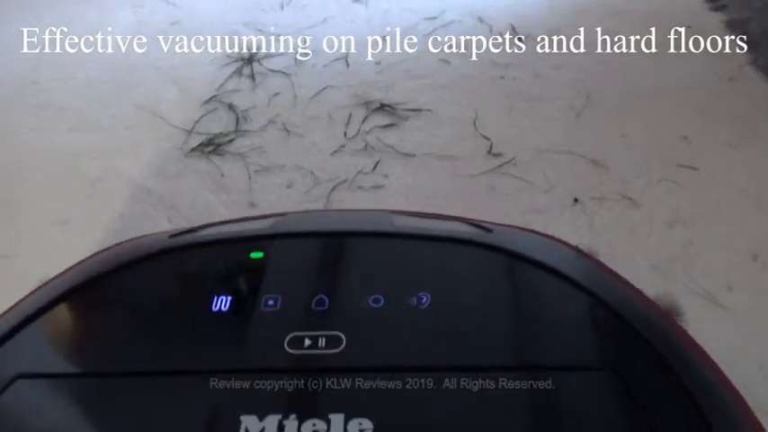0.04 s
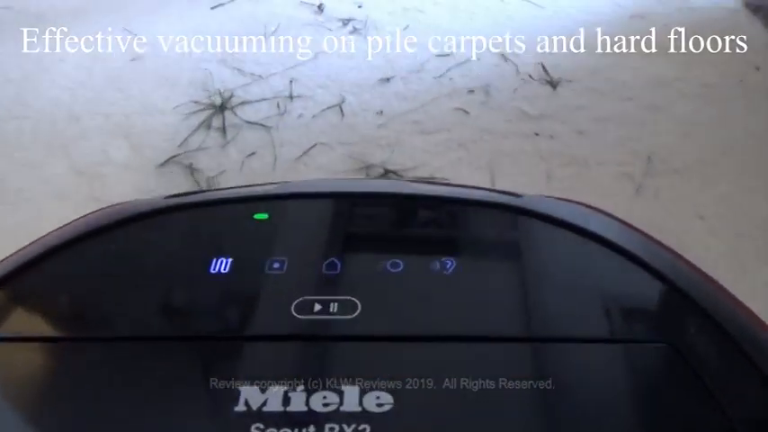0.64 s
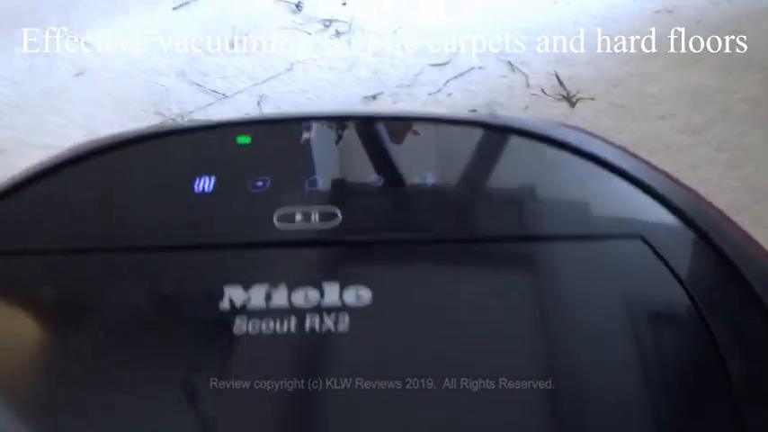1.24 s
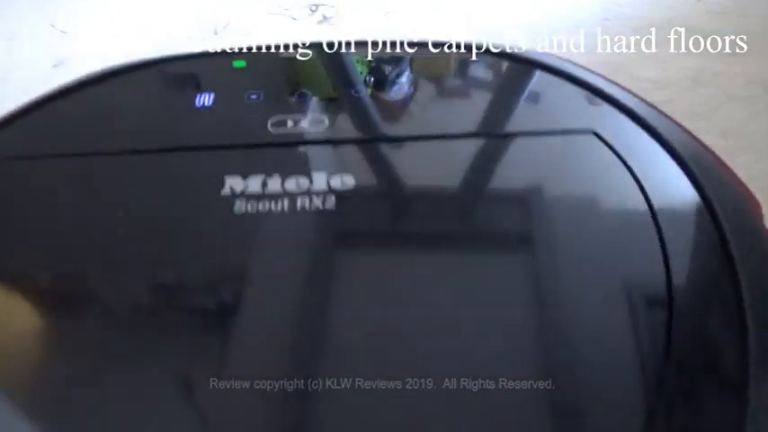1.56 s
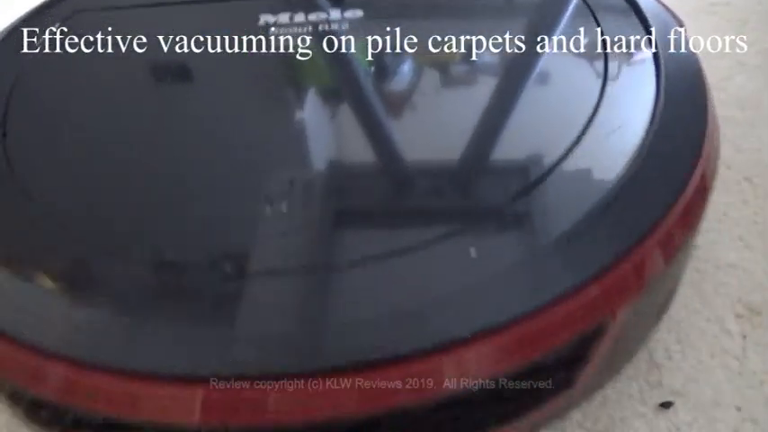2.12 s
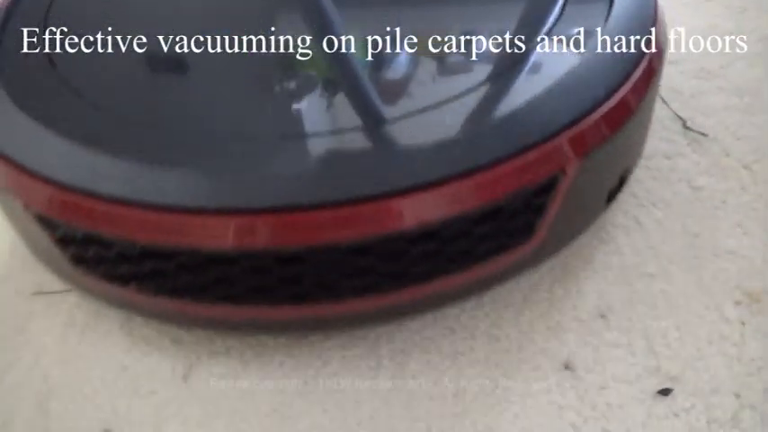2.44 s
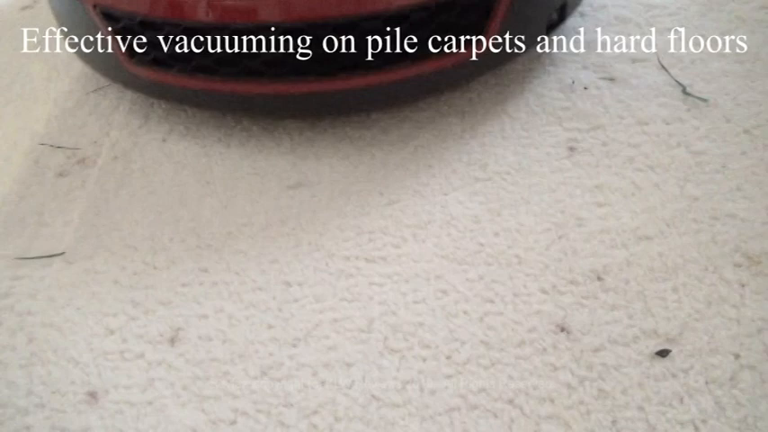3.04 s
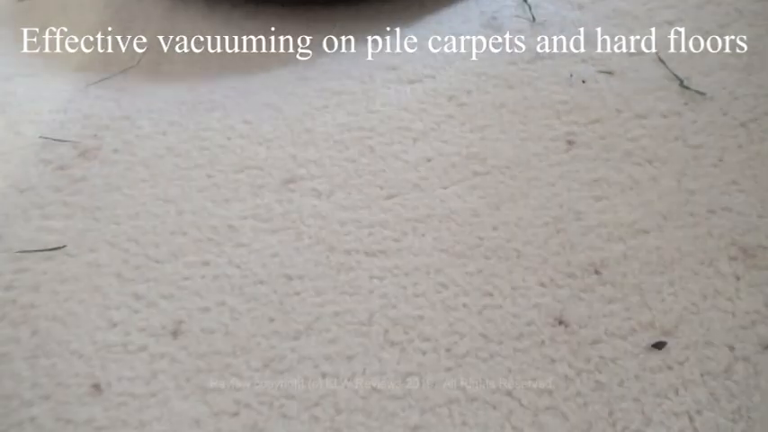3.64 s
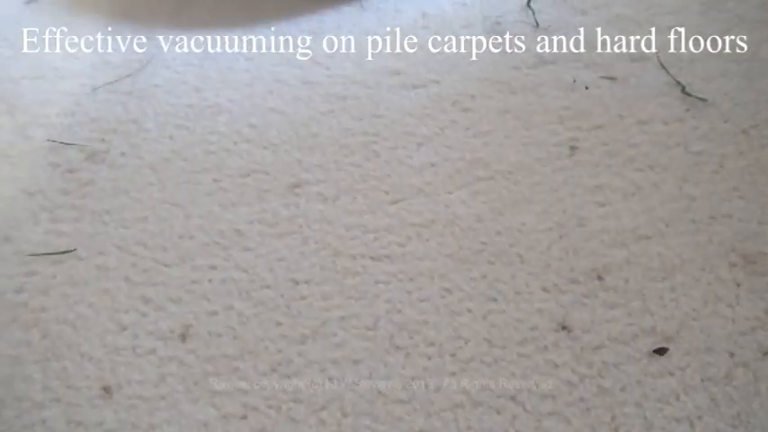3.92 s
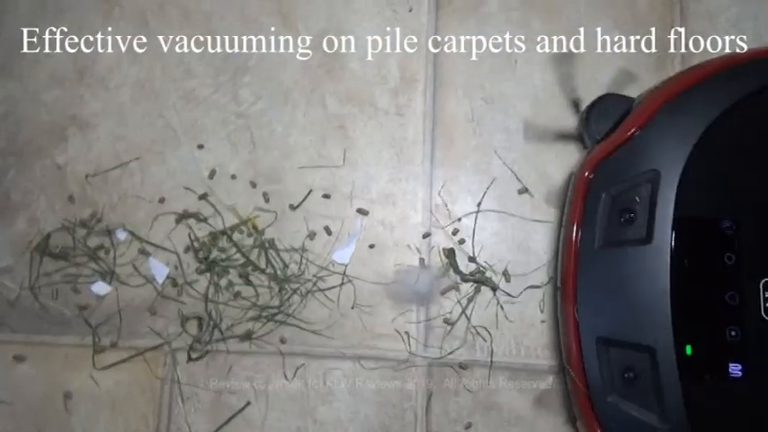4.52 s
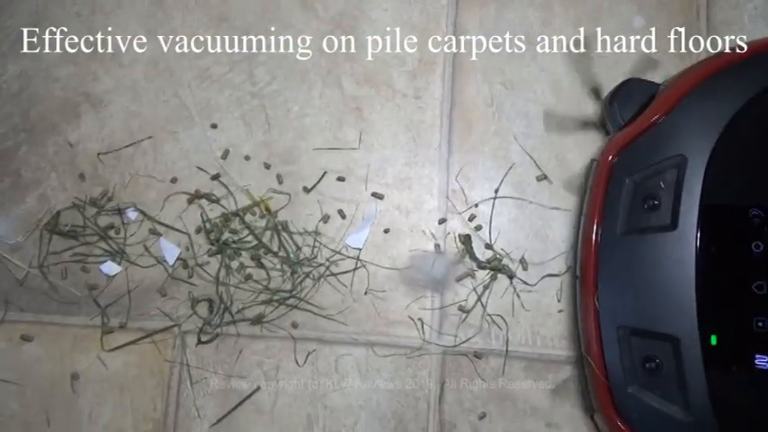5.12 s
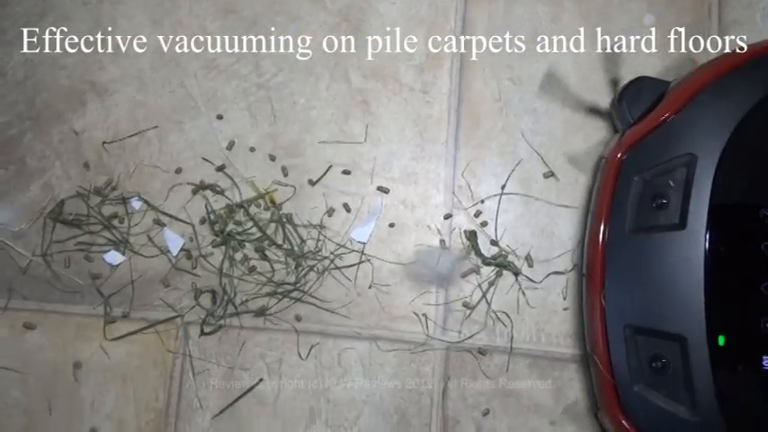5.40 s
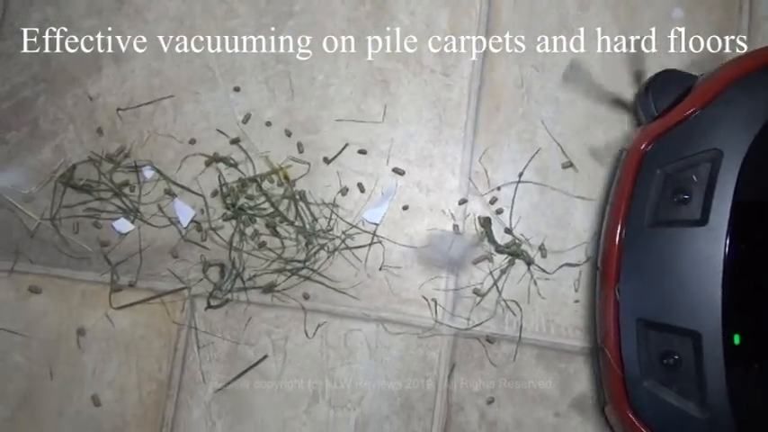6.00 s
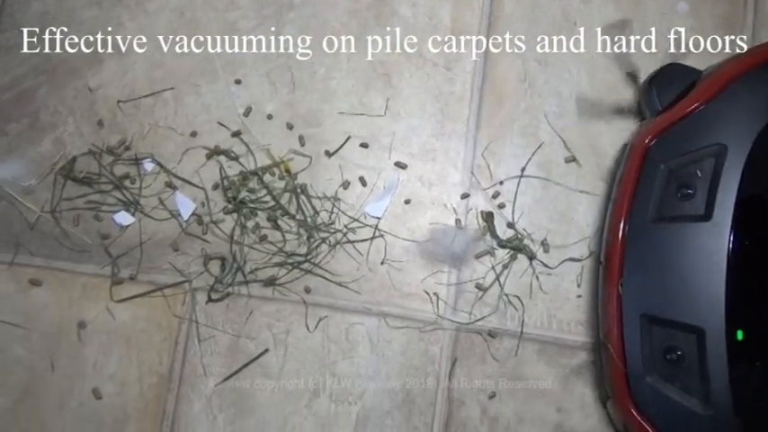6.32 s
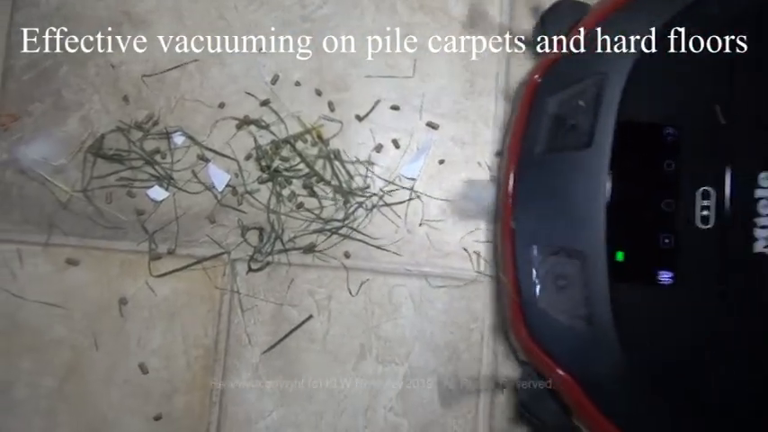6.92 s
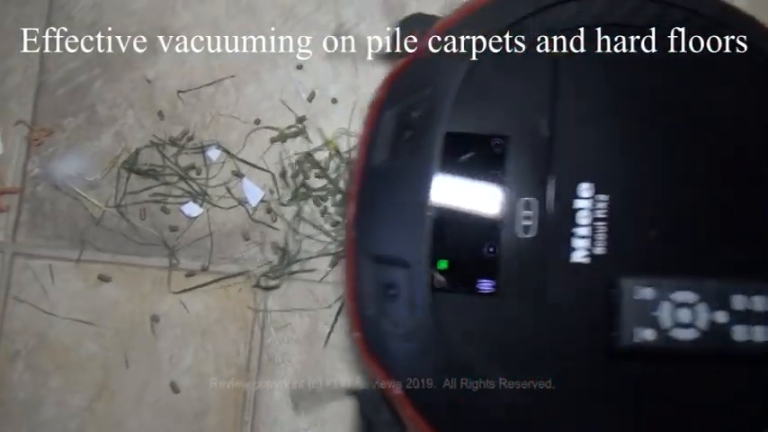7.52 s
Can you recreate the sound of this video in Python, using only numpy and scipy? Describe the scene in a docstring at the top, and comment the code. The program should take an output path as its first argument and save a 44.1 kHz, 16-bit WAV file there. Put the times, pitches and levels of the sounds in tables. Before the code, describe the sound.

A robot vacuum hums and rushes past on carpet, then creeps closer on tiles, sucking up crackling grass and seeds.

```python
"""A robot vacuum cleaner hums and rushes past on carpet, close by, and drives off. The scene dissolves
to a tiled floor, where its brush motor spins up and it creeps nearer, bumps over joints and sucks up
grass and seeds. Motor orders, an exhaust whistle and gear whine ride on the rumble of the roller brush
and on air rushing through ducts; seeds, grit and stalks tick and crack against the plastic."""
import sys
import numpy as np
from scipy import signal
from scipy.fft import rfft, irfft, next_fast_len
from scipy.io import wavfile
from scipy.ndimage import uniform_filter1d, map_coordinates

SR = 44100
rng = np.random.default_rng(int(sys.argv[2]) if len(sys.argv) > 2 else 0)


def waveform_to_disk(signal):
    """Save audio, clipped to [-1, 1], as 16-bit WAV at the path in sys.argv[1]."""
    frames = np.transpose(np.atleast_2d(signal))
    scaled = np.clip(frames, -1, 1) * 32767
    samples = np.round(scaled).astype(np.int16)
    wavfile.write(sys.argv[1], SR, samples)


N = 341775
TIME = np.arange(N) / SR
DRIVEN_CM = 20 * TIME  # the robot crosses the carpet at 20 cm a second


def amp(db):
    """Decibels to gain."""
    return np.exp(np.asarray(db) * (np.log(10) / 20))


def unit(x):
    """Scale to rms 1."""
    return x / np.sqrt(np.mean(x ** 2) + 1e-20)


def along(points, hz):
    """Read (Hz, value) points on a log frequency axis."""
    f, v = np.transpose(points)
    return np.interp(np.log(hz + 1), np.log(f + 1), v)


def curves(rows):
    """One automation curve for each column after the time."""
    s, *cols = np.transpose(rows)
    return [np.interp(TIME, s, c) for c in cols]


def wobble(rate):
    """A smooth random curve, rate knots a second."""
    coarse = TIME[::32]
    knots = rng.standard_normal(int(N * rate / SR) + 4)
    return np.interp(TIME, coarse, map_coordinates(knots, [coarse * rate], order=2))


def swells(rows):
    """Gain of bell-shaped swells. Each row: centre in seconds, level in dB, half length in seconds."""
    return np.sqrt(sum(amp(2 * db) * np.exp(-2 * ((TIME - s) / half_s) ** 2) for s, db, half_s in rows))


def filtered(x, response):
    """Shape x with a frequency response."""
    m = next_fast_len(N + 8192)
    return irfft(rfft(x, m) * response(np.fft.rfftfreq(m, 1 / SR)), m)[..., :N]


def rush(spectrum):
    """Noise of rms 1 with this spectrum, dying away above its last point."""
    top_hz = spectrum[-1][0]
    white = rng.standard_normal(N)
    return unit(filtered(white, lambda hz: amp(along(spectrum, hz)) / (1 + (hz / top_hz) ** 8)))


def angle(hz):
    """Phase of something that turns hz times a second."""
    return 2 * np.pi * (np.cumsum(hz) / SR + rng.random())


def tone(phase, db):
    """A sine with this rms level."""
    return np.sqrt(2) * amp(db) * np.sin(phase)


def duct(hz, width_hz):
    """Turbulence singing in one narrow resonance, at rms 1."""
    m = next_fast_len(N)
    gain = 1 / (1 + ((np.fft.rfftfreq(m, 1 / SR) - hz) / width_hz) ** 2)
    real, imag = rng.standard_normal((2, len(gain)))
    return unit(irfft(gain * (real + 1j * imag), m)[:N])


def passing_db(front_db, side_db, rear_db, at_cm, reach_cm):
    """Level of a part that shows its front, its side (after at_cm of travel), then its rear."""
    past = (DRIVEN_CM - at_cm) / reach_cm
    end_db = np.where(past < 0, front_db, rear_db)
    return end_db + (side_db - end_db) / (1 + past ** 2)


def carpet_roller(bite_db=4, bite_s=0.22):
    """Bristles beat the pile into a rumble, taking a moment to bite."""
    # Each row: frequency in Hz, relative level in dB.
    rumble = [(20, -60), (32, -50), (45, -46), (75, -25.5), (115, -12), (185, -9.5), (235, -6), (310, 4.5),
              (390, -7), (450, -1.5), (500, -7), (580, -6)]
    level_db = passing_db(-23, -22.5, -29, at_cm=65, reach_cm=15) - bite_db * np.exp(-TIME / bite_s)
    return rush(rumble) * amp(level_db + 0.36 * wobble(23.7))


def floor_colour(x, depth_db=0.46):
    """Floor reflections: a slow random drift in the colour of the air noise."""
    bands = signal.stft(x, nperseg=512)[2]
    drift = uniform_filter1d(rng.standard_normal(bands.shape), size=3, axis=0)
    drift = uniform_filter1d(drift, size=90, axis=1)
    return signal.istft(bands * amp(depth_db * unit(drift)), nperseg=512)[1][:N]


def carpet_air():
    """Air rushes through housing, intake and exhaust grille, each passing in its turn."""
    # Five bands of air noise, low to high. Each row: frequency in Hz, relative level in dB.
    housing_eq = [(380, -32), (520, -1), (680, 4.5), (800, 1.5), (1000, 0.5), (1250, -3), (1500, -10.5),
                  (2200, -54)]
    suction_eq = [(1000, -13), (1450, -1), (1650, 0), (2000, -1.5), (2400, -1.5), (3000, 0), (3500, -3.5),
                  (3900, -11), (5000, -16)]
    exhaust_eq = [(3000, -12.5), (3700, -2), (4000, -4), (4350, -1), (4900, -7), (5200, -8), (6000, -13)]
    hiss_eq = [(4500, -28), (5200, -3.5), (5600, 1.5), (6000, -0.5), (6800, 3), (7500, 1), (8200, 0),
               (8800, 3), (9600, -1.5), (10400, -5.5), (11200, -9), (13000, -35)]
    fizz_eq = [(9500, -27), (10600, 0), (11200, -3.5), (11900, -2), (13000, -2), (13700, -5), (14500, -6),
               (15700, -17)]
    housing = rush(housing_eq) * amp(passing_db(-29.5, -26.5, -35, at_cm=61, reach_cm=31.5))
    suction = rush(suction_eq) * amp(passing_db(-27, -26, -36, at_cm=42, reach_cm=19.5))
    suction *= amp(0.32 * wobble(40))
    exhaust = rush(exhaust_eq) * amp(passing_db(-38, -30, -41, at_cm=62.5, reach_cm=26))
    hiss = rush(hiss_eq) * amp(passing_db(-34.6, -30, -36.5, at_cm=43, reach_cm=10))
    fizz = rush(fizz_eq) * amp(passing_db(-43.5, -35.5, -40.5, at_cm=51.5, reach_cm=6))
    flutter = amp(1.04 * wobble(60))
    return housing + floor_colour(suction + (exhaust + hiss + fizz) * flutter)


def carpet_ducts(shade_db=11):
    """Narrow air resonances bloom as they come alongside, shaded ahead and behind."""
    # Each row: pitch in Hz, width in Hz, level alongside in dB, travel to there in cm, reach in cm.
    resonances = [(234, 13, -36.5, 38, 130), (322.5, 33, -26, 48, 83), (412.5, 67, -21, 14, 26),
                  (534, 25, -37.5, 77, 34), (878, 13, -32, 71, 34), (2100, 12, -36.5, 27, 30),
                  (3600, 77, -36.5, 11, 21), (3660, 160, -32, 55, 14), (4800, 92, -37.5, 57, 37),
                  (8250, 140, -41, 28, 17), (9050, 100, -43.5, 38, 50), (9480, 150, -39, 64, 9.9),
                  (9880, 170, -38.5, 37, 14), (10080, 170, -41, 71, 16), (10900, 130, -51, 38, 35),
                  (13400, 200, -52, 16, 50)]
    return sum(duct(hz, width_hz) * amp(passing_db(db - shade_db, db, db - shade_db, at_cm, reach_cm))
               for hz, width_hz, db, at_cm, reach_cm in resonances)


def exhaust_whistle(shaft):
    """The motor's sixth order drives a rough, fluttering whistle that comes and goes."""
    # Each row: centre in seconds, relative level in dB, half length in seconds.
    catches = [(.78, -23.5, 0.69), (2.45, -24.5, 0.58), (3.3, -31.5, 0.4), (4.05, -31, 0.16)]
    whistle = tone(angle(6 * shaft + 6 + 18 * wobble(60)), -7.5 + 2 * wobble(45))
    breath = amp(-7) * duct(hz=2648, width_hz=53)
    return (whistle + breath) * swells(catches)


def carpet_motor(gear_ratio=15.75, null_db=7, null_cm=4.6):
    """The loaded brush motor hums in clean orders, under a geared whine and the exhaust whistle."""
    # Each row: time in seconds, shaft speed in Hz.
    speed = [(0, 445.7), (.5, 445.4), (1.2, 444.6), (1.9, 445.2), (2.6, 446.5), (3.4, 447), (3.85, 447.9),
             (4.4, 448.2)]
    # Each row: order, travel in cm at which its floor echo cancels it, levels in dB in front,
    # alongside and behind, travel in cm when alongside, reach in cm.
    orders = [(2, 77, -29, -38.5, -29, 45, 8.8), (3, 71.6, -36, -29, -45, 45, 26),
              (4, 76.4, -26.5, -23.5, -33.5, 45.4, 19), (5, 58.3, -31.5, -31.5, -41.5, 44, 21)]
    # Each row: time in seconds, relative level of the whine in dB.
    whine_ride = [(0.0, -40), (0.36, -39.5), (1.05, -37), (1.39, -44), (1.84, -36.5), (3.63, -41.5),
                  (4.05, -40), (4.3, -53)]
    shaft_hz = curves(speed)[0]
    shaft = angle(shaft_hz * (1 + 0.00037 * wobble(23.7)))
    hum = tone(shaft, -38 + 3 * wobble(8))
    for order, cancel_cm, *path in orders:
        dip_db = null_db * np.exp(-((DRIVEN_CM - cancel_cm) / null_cm) ** 2)
        hum += tone(order * shaft, passing_db(*path) - dip_db + 0.5 * wobble(22.12))
    gear = angle(gear_ratio * shaft_hz * (1 + 0.000347 * wobble(29.9)))
    whine = tone(gear, curves(whine_ride)[0] - 0.3 + 0.77 * wobble(29.2))
    return hum + whine + exhaust_whistle(shaft_hz)


def nearing_db(far_db, near_db, lateness=1):
    """Level of a part as the robot creeps nearer on tiles; a lateness above 1 holds the rise back."""
    # Each row: time in seconds, closeness from 0 to 1.
    approach = [(4.5, 0), (5.4, .27), (6.15, 0.67), (7.15, 0.8), (7.45, 0.94), (7.75, .95)]
    return far_db + (near_db - far_db) * curves(approach)[0] ** lateness


def tile_motor(free_hz=441.6, slow_hz=50, start_s=4.25, spin_s=0.38):
    """The brush motor spins up to its free speed, its orders changing balance as the strain eases."""
    # Each row: order, level far in dB, level near in dB, lateness, extra dB under full strain.
    orders = [(1, -29, -35, 1, -25), (2, -48.5, -35, 2, 24), (3, -39, -23, 6.4, -29), (4, -37.5, -36, 1, 3)]
    strain = np.exp(-np.maximum(TIME - start_s, 0) / spin_s)
    shaft = angle((free_hz - slow_hz * strain) * (1 + 0.00068 * wobble(20)))
    return sum(tone(order * shaft, nearing_db(*rise) + strain_db * strain + wobble(14))
               for order, *rise, strain_db in orders)


def side_brush(sweep_hz=11.5, gear_hz=1086):
    """A gear whine swells and bends with each sweep of the side brush."""
    sweep = np.sin(angle(sweep_hz * (1 + 0.015 * wobble(3.3))))
    gear = angle(gear_hz + 16 * sweep + 10 * wobble(60))
    gear_db = np.interp(TIME, [4.5, 6.2, 7.1, 7.7], [-39, -34.5, -32, -50])
    return tone(gear, gear_db) * (1 + 1.05 * sweep)


def drives():
    """The drives sing slightly wavering notes on the tiles."""
    # Each row: pitch in Hz, wander in Hz, level far in dB, level near in dB.
    notes = [(360.7, 2.5, -37, -33.5), (430, 2.5, -36, -35), (2148, 6, -35, -31)]
    return sum(tone(angle(hz + wander_hz * wobble(30)), nearing_db(*rise) + wobble(25))
               for hz, wander_hz, *rise in notes)


def tile_roller():
    """The roller brush rumbles freely on the hard floor."""
    # Each row: frequency in Hz, relative level in dB.
    rumble = [(28, -46), (48, -36), (80, -38), (110, -17), (150, -13), (200, -10.5), (270, -1.5),
              (340, 0.5), (430, 0), (540, 0.5), (660, -12)]
    return rush(rumble) * amp(nearing_db(-32, -23.5, lateness=0.81) + 0.72 * wobble(24))


def tile_air():
    """Air rushes through housing and intake and sings in the ducts, growing as the robot nears."""
    # Three bands of air noise, low to high. Each row: frequency in Hz, relative level in dB.
    housing_eq = [(450, -9), (620, 5.5), (780, 0.5), (950, 0.5), (1200, -0.5), (1450, -7), (1900, -6),
                  (2600, -43)]
    suction_eq = [(1300, -14.5), (1620, 6.5), (1830, 3), (2000, 6), (2400, 1), (2750, 5), (3100, -2.5),
                  (3500, -3), (4300, -1.5), (5200, -5), (6200, -16), (8000, -40)]
    hiss_eq = [(4500, -11), (5300, 0.5), (6000, -3.5), (6600, 2.5), (7400, 1.5), (8800, 1.5), (9900, -1),
               (11000, -6.5), (12300, -13), (13600, -14), (15700, -19)]
    # Each row: pitch in Hz, width in Hz, level far in dB, level near in dB.
    resonances = [(157.6, 11, -52, -40), (353.7, 8.3, -36.5, -28), (494, 3.6, -40.5, -30.5),
                  (644, 94, -71, -30), (1820, 20, -55, -44), (2200, 34, -37, -30), (2680, 25, -49, -50),
                  (2960, 30, -66, -36), (3236, 22, -44, -38.5), (3740, 51, -65, -35),
                  (4270, 46, -41, -42.5)]
    scrape = amp(0.47 * wobble(70))  # bristles flick the tiles
    housing = rush(housing_eq) * amp(nearing_db(-32, -22.5, lateness=0.96))
    suction = rush(suction_eq) * amp(nearing_db(-30.5, -23))
    hiss = rush(hiss_eq) * amp(nearing_db(-35.5, -27.5, lateness=0.96))
    ducts = sum(duct(hz, width_hz) * amp(nearing_db(*rise)) for hz, width_hz, *rise in resonances)
    return (housing + suction + hiss) * scrape + ducts


def wheels(bump_half_s=0.045):
    """The floor drums under the wheels and booms as they drop into joints and ride over litter."""
    # Each row: frequency in Hz, relative level in dB.
    boom = [(18, -32), (32, -19), (45, -5), (62, -3), (76, 11), (90, -7), (110, -2)]
    # Each row: time in seconds, relative level in dB.
    bumps = [(6.62, -38), (6.69, -26), (6.91, -34), (7.03, -28.5), (7.13, -31), (7.26, -29), (7.49, -37),
             (7.72, -27)]
    rolling = amp(nearing_db(-66, -35, lateness=2.2))
    jolts = swells([(s, db - 1, bump_half_s) for s, db in bumps])
    return rush(boom) * (rolling + jolts)


def ticks(times, sizes, hz, t60):
    """Short damped rings, one per impact, each swelling over its first cycle."""
    t = np.arange(SR // 70) / SR
    cycles = hz[:, None] * t
    envelope = (1 - np.exp(-cycles ** 2)) * amp(-60 * t / t60)
    rings = sizes[:, None] * np.sin(2 * np.pi * cycles) * envelope
    at = (times * SR).astype(int)[:, None] + np.arange(len(t))
    return np.bincount(at.ravel(), rings.ravel(), N)[:N]


def seeds(spread=0.104, mode_count=7):
    """Each hard seed strikes the intake: a cluster of high plastic modes and a short, lower click."""
    # Each row: start in seconds, relative level in dB, centre of the ring in Hz.
    strikes = [(4.6768, -20, 7750), (5.9968, -17, 9570), (6.299, -19, 9500), (6.705, -14, 9690),
               (6.7436, -17, 8940), (6.978, -14, 9320), (7.202, -15, 9250), (7.421, -14, 8190),
               (7.448, -13, 9040), (7.4894, -10, 7600), (7.5445, -10, 11100), (7.5605, -8, 9000),
               (7.6682, -7.5, 9880), (7.7404, -11, 7900)]
    s, db, hz = np.transpose(strikes)
    scatter = rng.uniform(-1.7, 1.7, (len(s), mode_count))
    ring = sum(ticks(s, amp(db - 13), hz * np.exp(spread * shift), t60=0.023) for shift in scatter.T)
    click = ticks(s, amp(db - 1), 0.52 * hz, t60=0.0031)
    return ring + click


def litter(low_hz=2400, high_hz=11200, clump=0.8):
    """Grass and grit crackle up the intake in clumps of grains, denser as a tuft goes in."""
    # Each row: centre in seconds, relative level in dB, half length in seconds.
    tufts = [(6.74, -33, 0.046), (7.32, -31.5, .07), (7.44, -26.5, .05), (7.545, -25, 0.059),
             (7.75, -23, .05)]
    flow = np.hypot(amp(nearing_db(-68.5, -37.5, lateness=1.4)), swells(tufts))
    rate = 800 * np.sqrt(flow / flow.max())  # grains a second, before clumping
    times = TIME[rng.random(N) < rate * np.exp(clump * wobble(45)) / SR]
    sizes = amp(rng.uniform(-3.4, 3.4, len(times)))
    modes = rng.uniform(low_hz, high_hz, size=(len(times), 4))
    grains = sum(ticks(times, sizes, hz, t60=0.004) for hz in modes.T)
    return unit(grains / np.sqrt(rate)) * flow * amp(1)


def stalks(spread=0.079, crack_t60=0.014):
    """Stiff stalks, flung by the roller, crack dryly and knock the low modes of its housing."""
    # Each row: start in seconds, relative level in dB.
    hits = [(6.795, -14), (6.977, -12.5), (6.987, -23), (7.301, -10), (7.44, -15), (7.479, -11),
            (7.512, -8), (7.556, -18), (7.72, -23)]
    s, db = np.transpose(hits)
    modes_hz = [640, 955, 1440, 2180, 2950, 3950]
    scatter = rng.standard_normal((len(s), len(modes_hz)))
    knock = sum(ticks(s, amp(db - 6), hz * np.exp(spread * shift), t60=0.016)
                for hz, shift in zip(modes_hz, scatter.T))
    snap = sum((TIME >= at) * amp(level - 3 - 60 * np.abs(TIME - at) / crack_t60) for at, level in hits)
    return knock + snap * rush([(800, 2.5), (4000, -1), (10500, -6)])


def room(x, t60=0.41):
    """The walls answer with a short, diffuse tail."""
    # Each row: frequency in Hz, reverb level in dB.
    wall_eq = [(60, -20), (330, -21), (800, -10), (3000, -13.5), (8500, -12), (11000, -22), (14000, -67)]
    t = np.arange(SR // 3) / SR
    tail = rng.standard_normal(len(t)) * amp(-60 * t / t60)
    wet = signal.fftconvolve(x, tail / np.linalg.norm(tail))[:N]
    return filtered(wet, lambda hz: amp(along(wall_eq, hz)))


def direction(mid):
    """The side signal that places the robot, by level and phase between left and right."""
    # Each row: time in seconds, pan as side share (left is positive).
    pan = [(0, 0.14), (2.2, 0.15), (3.2, 0.1), (4.2, 0.043), (4.6, -0.15), (6.5, -0.21), (7.75, -0.09)]
    # Each row: frequency in Hz, weight of the pan.
    pan_weight = [(230, 0), (520, 1.35), (1200, 0.99), (2000, 0.75), (3200, 1.1), (7000, 0.86),
                  (11000, 0.15)]
    # Each row: frequency in Hz, side share a quarter cycle ahead, so that the left leads.
    phase_lead = [(70, 0.11), (320, 0.34), (700, 0.18), (1300, 0.26), (2100, .02), (10000, 0.012)]
    bearing = curves(pan)[0] * filtered(mid, lambda hz: along(pan_weight, hz))
    return bearing + filtered(mid, lambda hz: 1j * along(phase_lead, hz))


def scene():
    """Carpet dissolves into tiles; the robot moves from left of centre to the right."""
    # Each row: time in seconds, carpet gain, tile gain.
    crossfade = [(4.2, 0.98, 0.089), (4.32, 0.98, 0.37), (4.41, 0.58, 0.72), (4.48, 0.071, 0.75)]
    on_carpet, on_tiles = curves(crossfade)
    noise = on_carpet * (carpet_roller() + carpet_air() + carpet_ducts())
    noise += on_tiles * (tile_roller() + tile_air() + wheels() + litter())
    noise += seeds() + stalks()
    tones = on_carpet * carpet_motor() + on_tiles * (tile_motor() + side_brush() + drives())
    mid = noise + tones
    side = direction(mid) + room(noise + 0.64 * tones)
    return np.array([mid + side, mid - side])


def record(dry, bass_hz=34, top_hz=15750):
    """Roll off the deepest bass and cut everything above the top of the band."""
    return filtered(dry, lambda hz: (hz < top_hz) * hz ** 4 / (hz ** 4 + bass_hz ** 4))


dry = scene()
out = record(dry)
waveform_to_disk(out)
```